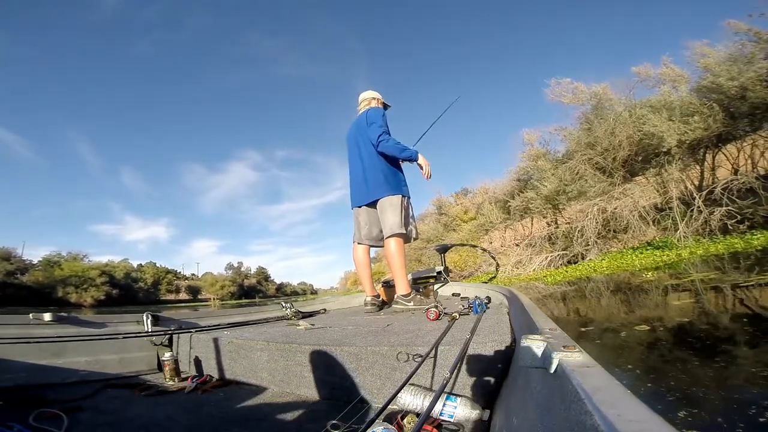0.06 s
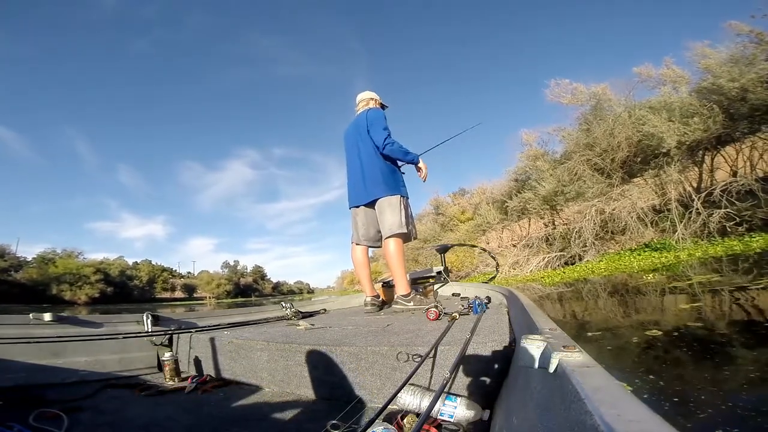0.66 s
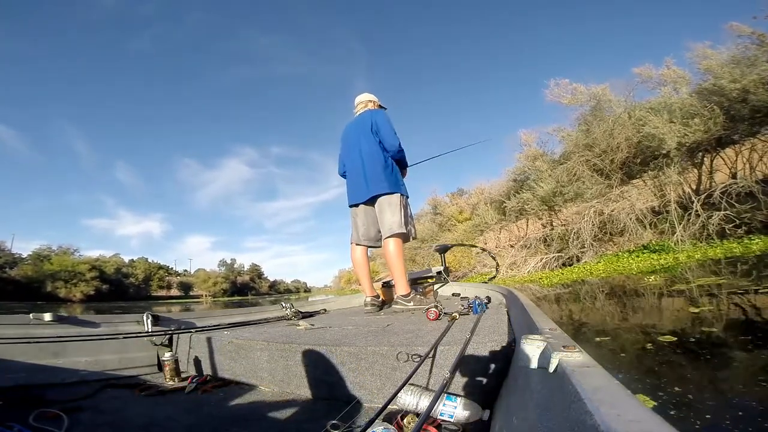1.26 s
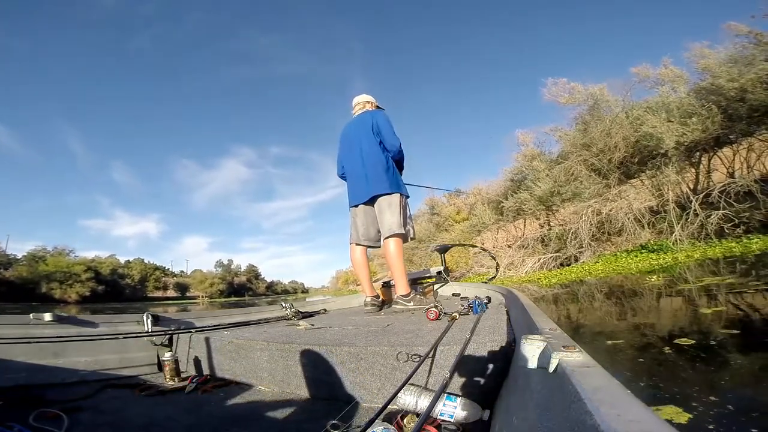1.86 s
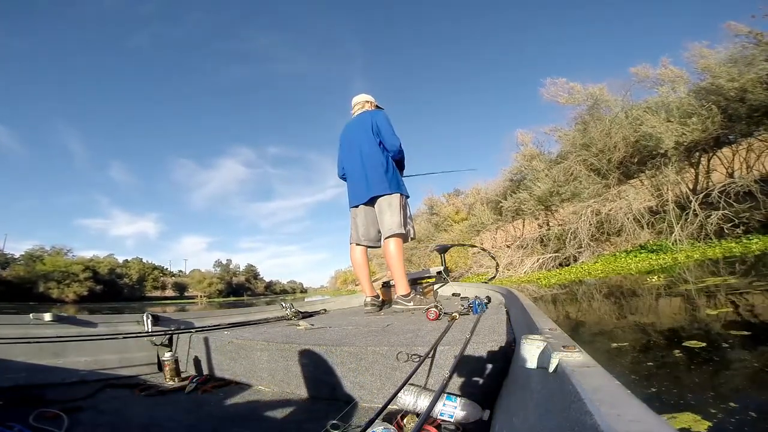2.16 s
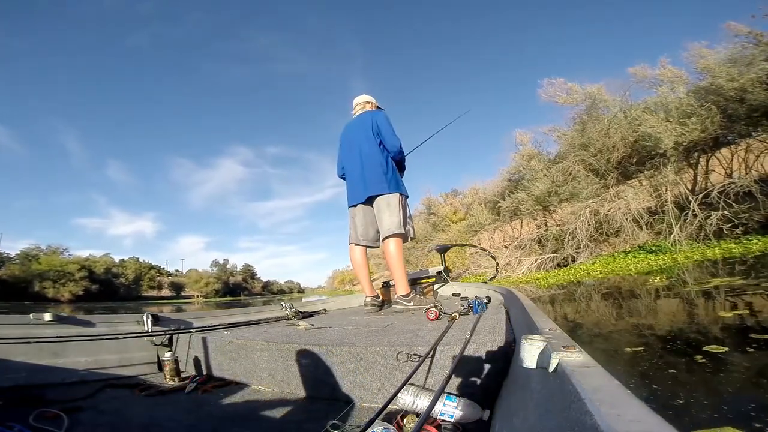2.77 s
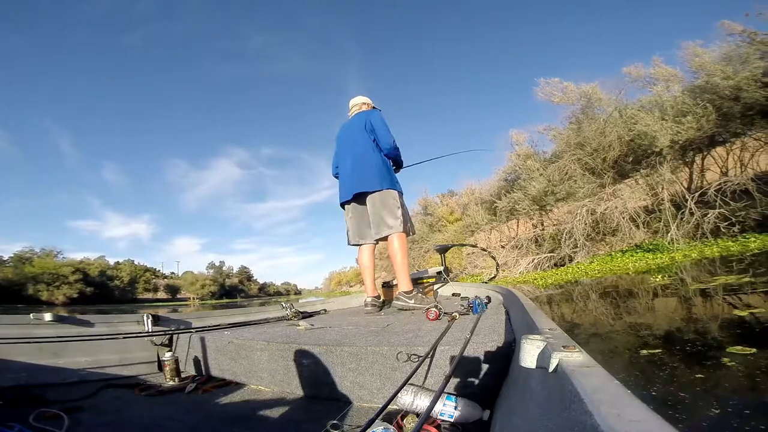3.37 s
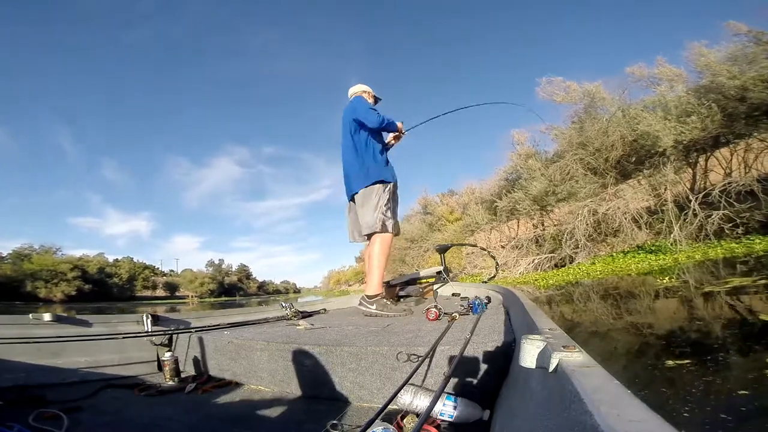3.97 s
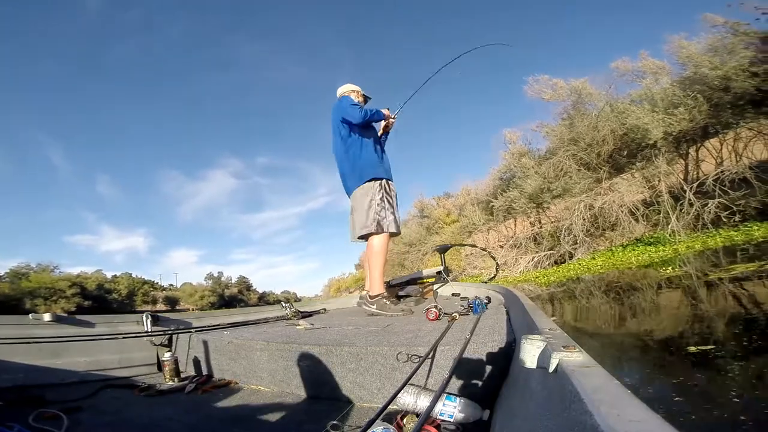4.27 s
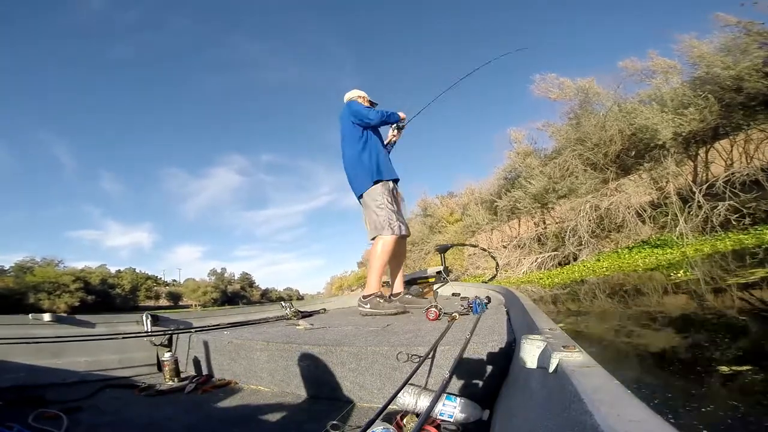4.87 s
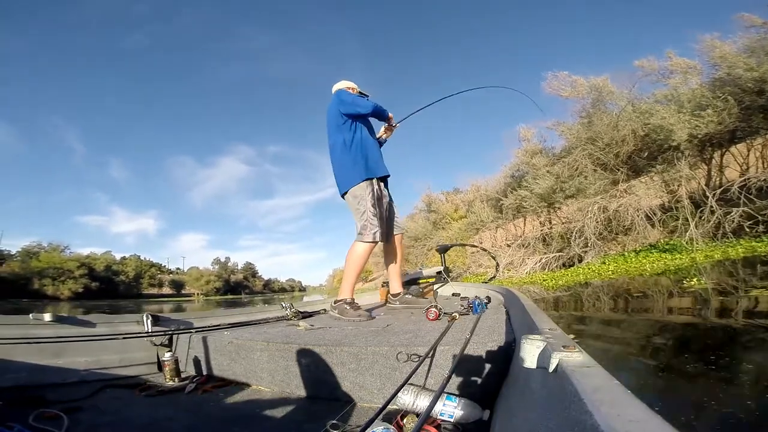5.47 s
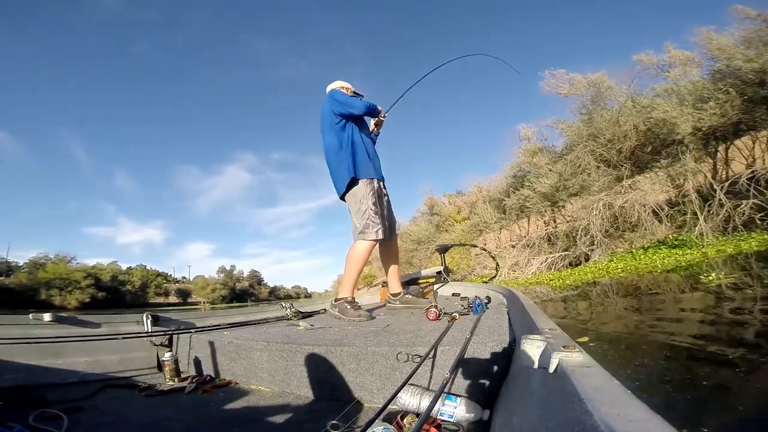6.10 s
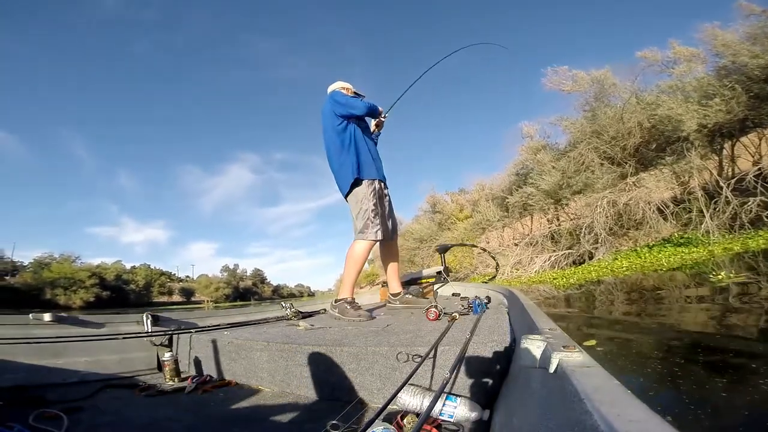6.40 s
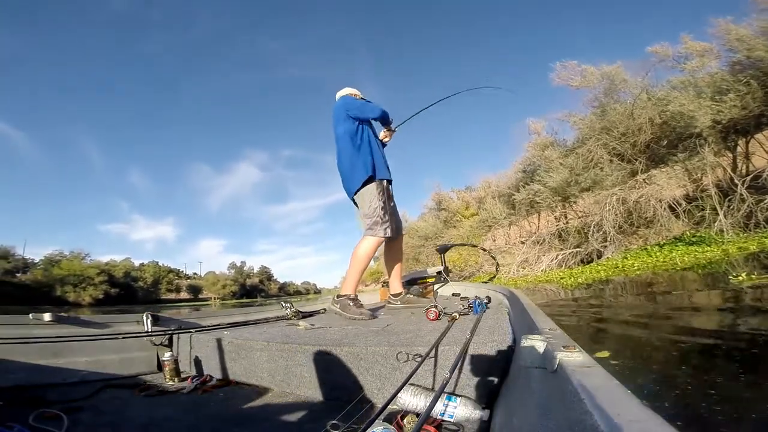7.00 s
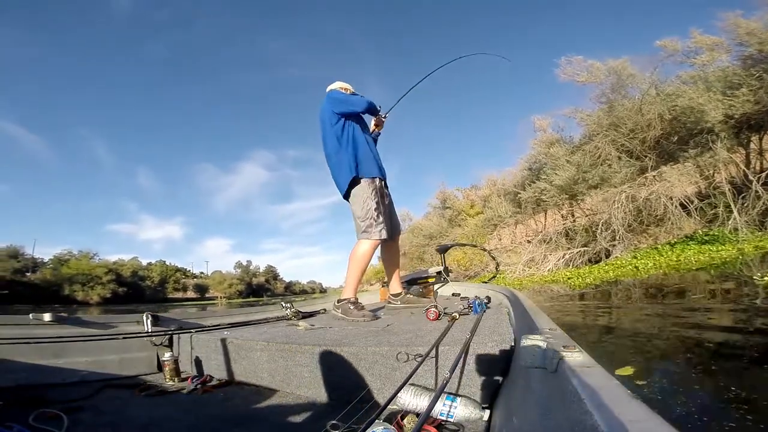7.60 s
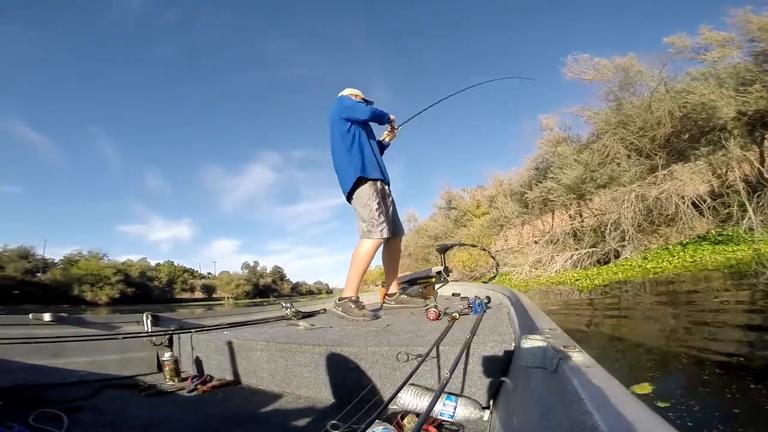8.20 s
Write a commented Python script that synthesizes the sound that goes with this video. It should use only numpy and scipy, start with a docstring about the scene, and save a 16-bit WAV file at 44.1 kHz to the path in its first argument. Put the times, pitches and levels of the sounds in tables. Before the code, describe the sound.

On a small boat on still water, sparse woody knocks and water slaps sound on the hull over a quiet outdoor hiss. About three seconds in, an angler's feet start thumping the hollow deck and the boat rumbles as it rocks. A reel whirrs faintly, tackle clicks, and the taut line squeaks briefly. Stamps and knocks continue to the end, heard from a microphone on the hull.

```python
"""An angler on the bow deck of a small boat on still water, heard from a microphone on the hull.
Over a quiet outdoor bed come woody knocks on the hull, many of them slaps of water, with clicks of tackle,
light steps and scuffs. Just after 3 s he hooks a fish: the reel whirrs faintly under load, loose gear
stirs, and his feet set the hollow deck booming and the boat rocking. Around 5 s the taut line squeaks
and a twisting sole groans; he stamps and plays the fish to the end."""
import sys
import numpy as np
from scipy import signal
from scipy.fft import rfft, irfft
from scipy.io import wavfile

SR = 44100
rng = np.random.default_rng(int(sys.argv[2]) if len(sys.argv) > 2 else 0)


def to_wav(sig):
    """Store sig (one row per channel, or 1-D mono) as 16-bit WAV at the path in sys.argv[1].

    Samples outside -1..1 are clipped; the rate is SR.
    """
    pcm = np.clip(np.atleast_2d(sig), -1, 1) * 32767
    pcm = np.round(pcm).astype(np.int16)
    wavfile.write(sys.argv[1], SR, pcm.T)  # frames by channels


N = 363825
TIME = np.arange(N) / SR

# outdoor bed of still air and hiss: f/Hz, level/dB
AIR_SPECTRUM = [(12, -37), (20, -16.5), (74, 2.5), (92, -1.5), (152, -8.5), (231, -7.5), (323, -11),
                (427, -14.5), (504, -15), (766, -18), (1040, -20.5), (1540, -23), (1720, -24.5),
                (2750, -27), (15500, -50)]
# the hull idling on the water: f/Hz, width/Hz, level/dB
IDLE_MODES = [(28, 19, -1.5), (70, 5.7, -7), (83.2, 4.6, 1.5)]
# ring of the panels and fittings: f/Hz, width/Hz, level/dB
PANEL_MODES = [(159.4, 21.2, 0), (213, 31.8, 5), (272.6, 32.3, 3), (359, 31, -2.5), (443, 49, -1.5),
               (561, 71, -4), (711, 93, -10), (880, 150, -12.5), (1055, 63, -8.5), (1303, 44, -16),
               (1418, 63, -17.5), (1847, 76, -9), (2315, 116, -13), (2614, 104, -20), (2918, 80, -15),
               (3190, 99, -20.5), (3484, 110, -24), (4030, 430, -35), (4656, 130, -29.5),
               (5230, 200, -41.5), (5860, 500, -38.5), (7400, 1100, -49.5), (9800, 2200, -59)]
# the bands a hit is layered from: low/Hz, high/Hz, delay/s, decay multiplier, level/dB
HIT_BANDS = [(151.3, 355, .001, 1.4, -1.5), (337, 670, -.001, 1.15, -2.5), (655, 1635, -.002, 1, -1.5),
             (1374, 2470, -.0016, .8, -2.5), (2576, 3970, 0, .85, -2), (4380, 11800, -.0004, .4, 0)]
# woody knocks on the hull, many of them slaps of water: t/s, level/dB, hardness (treble lift)/dB, decay/s
KNOCKS = [(0.773, -46.5, 2, .011), (0.791, -40, -10, 0.0089), (1.465, -56, 4.5, 0.014),
          (1.717, -45, 0, 0.02), (2.437, -43.5, -2, 0.018), (2.481, -54.5, 1, 0.017), (2.988, -43, 0, .012),
          (3.209, -52, -5, 0.022), (3.459, -43, -4, 0.041), (3.590, -38.5, -3.5, 0.013),
          (3.729, -37, -2.5, 0.0035), (3.775, -48, -0.5, 0.018), (3.86, -41.5, -2.5, 0.021),
          (3.916, -37.5, -4.5, 0.014), (3.949, -37.5, -13, 0.0037), (3.969, -24, -15.5, 0.012),
          (3.986, -32, -10.5, 0.0077), (4.063, -36, 1.5, 0.016), (4.28, -46, -3.5, .01),
          (4.338, -40.5, -7, 0.018), (4.485, -38, -2.5, 0.011), (4.563, -41, -8.5, 0.0055),
          (4.718, -37.5, -18, 0.0096), (4.774, -38.5, -19.5, 0.0079), (4.804, -23.5, -11, 0.0088),
          (4.823, -30, -20, 0.022), (4.848, -40, -1.5, 0.0066), (5.128, -50, -5, 0.033),
          (5.243, -37, 1, .008), (5.44, -46, -9.5, .02), (5.512, -49, 0.5, 0.0057), (5.844, -51, 0, .009),
          (6.032, -41, 0.5, 0.022), (6.055, -35.5, -15, 0.0092), (6.09, -45.5, 0.5, 0.0055),
          (6.205, -49, -4.5, 0.026), (6.385, -49.5, 5, 0.0096), (6.542, -45, 0, 0.011),
          (6.722, -45, -9, 0.012), (6.997, -42.5, -0.5, 0.012), (7.114, -48, -18, .009),
          (7.196, -41.5, -22, 0.015), (7.254, -44, -3.5, 0.021), (7.553, -42, -0.5, 0.011),
          (7.585, -35.5, -13.5, .012), (7.599, -35.5, -24, 0.015), (7.668, -41, -6.5, 0.0076),
          (7.801, -37.5, 2, 0.0047), (7.855, -44, -6.5, .011), (7.933, -41, -7.5, 0.012),
          (8.089, -46, -13, 0.036)]
# woody EQ of a knock: f/Hz, level/dB
KNOCK_EQ = [(240, 2.5), (460, 2.5), (1000, 0.5), (2000, -0.5), (3200, -6), (6800, -23.5)]
# sharp clicks of tackle: t/s, level/dB
CLICKS = [(0.777, -66), (0.791, -65), (1.72, -67), (2.502, -67), (2.977, -66), (2.988, -55.5),
          (3.115, -61.5), (3.459, -57), (3.918, -52.5), (4.062, -57), (4.081, -59), (4.117, -58),
          (4.338, -64), (4.775, -64.5), (4.847, -59), (5.243, -48.5), (6.032, -58), (6.346, -65),
          (6.996, -58), (7.553, -56), (7.668, -53.5)]
# bright EQ of a click, dull EQ of a sole's slap: f/Hz, level/dB
CLICK_EQ = [(290, -5), (1100, -0.5), (2000, 1.5), (3200, 7), (6800, 1.5)]
SOLE_EQ = [(290, -1), (700, -14.5), (2000, -31.5), (6800, -55.5)]
# footfalls and stamps: t/s, weight on the deck/dB, heave of the hull/dB, slap of the sole/dB
STEPS = [(0.793, -39, -58, -47), (1.711, -39.5, -62, -50), (2.49, -49, -50, -44.5),
         (3.549, -38, -27, -37.5), (3.594, -45, -24.5, -35), (3.747, -23, -19, -26),
         (3.794, -13, -35, -29.5), (3.954, -8.5, -22.5, -24), (4.334, -32.5, -36, -32),
         (4.567, -11, -41.5, -26), (4.783, -19.5, -40, -19), (4.813, -30, -11, -31.5),
         (5.2, -22.5, -20, -35), (5.24, -19, -29, -31.5), (5.42, -25, -51, -39), (6.092, -28.5, -62, -34),
         (6.22, -34.5, -66, -43.5), (6.71, -32, -52, -39.5), (6.8, -22.5, -58, -43), (7.021, -47, -47, -39),
         (7.196, -18, -22, -28.5), (7.24, -28.5, -20, -58), (7.629, -35, -46, -37),
         (7.803, -27, -53, -30.5), (7.869, -22.5, -63, -37.5), (7.946, -13.5, -36, -29.5),
         (8.03, -19, -25, -35.5), (8.08, -16.5, -48, -41)]
# boom of hull and deck under a step: f/Hz, level/dB, t60/s
BOOM_MODES = [(27.7, -1.5, 0.43), (52.5, 5, 0.31), (90.34, 0, 0.5), (122, -7, .12), (171.8, 7.5, 0.11),
              (215.2, 6.5, 0.39), (264, -10, 0.04), (358.5, -14.5, 0.3)]
# rumble of the rocking hull: f/Hz, width/Hz, level/dB
ROCKING_MODES = [(25.8, 9.0, -1.1), (53.3, 9.6, -2.1), (88.1, 6.3, -0.5)]
# soles and gear sliding, and the line zipping at 4.07 s: t/s, length/s, level/dB, tilt/(dB per octave)
SCRAPES = [(1.225, 0.063, -54, 0), (1.679, 0.05, -51, -1.5), (3.133, 0.051, -52, 1.5),
           (4.072, 0.075, -50, 5.5)]
# level ride of the reel under load: t/s, level/dB
REEL_LOAD = [(3.3, -69), (3.59, -66.5), (3.96, -55), (4.08, -59), (4.51, -62.5), (5.09, -57.5),
             (5.59, -67.5), (6.55, -63), (6.76, -58.5), (7.64, -65), (7.71, -62), (8.25, -60.5)]
# ring of the reel's frame: f/Hz, width/Hz, level/dB
REEL_MODES = [(1050, 200, -6), (1924, 78, 4.5), (2305, 58, -3), (2910, 220, -9), (3360, 190, -9),
              (3750, 380, -15.5), (5400, 1900, -20)]
# squeaks of taut line and reel: t/s, length/s, f/Hz, bend at the middle/Hz, level/dB
SQUEAKS = [(4.893, 0.069, 2930, 96, -58.5), (5.006, 0.042, 2890, 66, -54.5), (5.025, 0.072, 1855, 67, -60),
           (5.081, 0.07, 1860, 41, -63), (5.145, 0.079, 1850, -81, -56), (5.28, .052, 1820, 117, -58.5),
           (6.866, 0.04, 1840, 307, -57.5)]


def from_db(db):
    """Decibels as a gain."""
    return 10 ** (np.asarray(db) / 20)


def rms_one(x):
    """Normalise to an RMS of 1."""
    return x / np.sqrt(np.mean(x ** 2) + 1e-20)


def add(track, start_s, sound):
    """Lay a sound into a track."""
    at = max(round(start_s * SR), 0)
    track[at:at + len(sound)] += sound[:N - at]


def band(x, low_hz, high_hz):
    """Band-pass with steep edges."""
    return signal.sosfilt(signal.butter(3, [low_hz, high_hz], "band", fs=SR, output="sos"), x)


def resonate(x, modes):
    """Parallel resonators of alternating polarity."""
    out = 0
    for k, (hz, width, db) in enumerate(modes):
        r = np.exp(-np.pi * width / SR)
        poles = [1, -2 * r * np.cos(2 * np.pi * hz / SR), r * r]
        out = out + (-1) ** k * from_db(db) * (1 - r * r) / 2 * signal.lfilter([1, 0, -1], poles, x)
    return out


def grains(size, spread_db=5):
    """Grit: dense tiny contacts of very uneven strength."""
    return rng.standard_normal(size) * from_db(spread_db * np.clip(rng.standard_normal(size), -3, 3))


def drift(rate_hz):
    """Random modulator that glides from value to value."""
    return np.interp(TIME * rate_hz, np.arange(N), rng.standard_normal(N))


def arch(length_s):
    """Half a sine: a stroke that swells and ends."""
    return np.sin(np.linspace(0, np.pi, max(round(length_s * SR), 2))).clip(0)


def air(hiss_db=-50.5, murmur_db=-60):
    """A steady outdoor bed; the idle hull murmurs on the water."""
    hz, db = np.transpose(AIR_SPECTRUM)
    bins_hz = np.maximum(np.arange(N // 2 + 1) * SR / N, 1)
    eq = from_db(np.interp(np.log(bins_hz), np.log(hz), db))
    hiss = irfft(rfft(rng.standard_normal(N)) * eq, N)
    murmur = resonate(rng.standard_normal(N), IDLE_MODES)
    return from_db(hiss_db) * rms_one(hiss) + from_db(murmur_db) * rms_one(murmur)


def rattle(hits, eq, rise_s=0.0019, tail_db=-22, tail_s=0.064, graze_db=-13, graze_s=0.0028):
    """Each hit grazes, then rattles out into the panels; the lows come later and last longer."""
    lead = SR // 50  # room for the graze ahead of the hit
    attack = slice(lead, lead + SR // 40)
    t = TIME[:SR // 4] - TIME[lead]
    after = np.maximum(t, 0)
    graze = from_db(graze_db) * np.exp(-np.abs(t) / graze_s)
    rise = 1 - np.exp(-after / rise_s)
    panel_ring = resonate(signal.unit_impulse(len(t)), PANEL_MODES)
    eq_hz, eq_db = np.transpose(eq)
    out = np.zeros(N)
    for low, high, delay, stretch, gain_db in HIT_BANDS:
        ring = band(panel_ring, low, high)
        log_centre = np.log(low * high) / 2
        band_db = gain_db + np.interp(log_centre, np.log(eq_hz), eq_db)
        shelf = np.interp(log_centre, np.log([1100, 1960]), [0, 1])  # hard contacts lift the treble
        tail = from_db(tail_db) * np.exp(-after / (tail_s * stretch))  # loose gear trembles on
        for start, db, hardness_db, decay in hits:
            body = np.exp(-after / (decay * stretch))
            force = grains(len(t)) * (graze + rise * (body + tail))
            sound = signal.fftconvolve(force, ring)[:len(t)]
            gain = from_db(db + band_db + shelf * hardness_db)
            add(out, start + delay + t[0], gain * sound / np.std(sound[attack]))
    return out


def knocks(click_decay_s=0.0065):
    """Woody knocks on the hull, many of them slaps of water, and short bright clicks of tackle."""
    clicks = [(start, db, 0, click_decay_s) for start, db in CLICKS]
    return rattle(KNOCKS, KNOCK_EQ) + rattle(clicks, CLICK_EQ)


def steps(rise_s=0.0017, slap_decay_s=0.019, detune=0.011, hatch_db=-5):
    """A soft sole slaps the panels and sets the hull booming, tuned a little differently at each spot."""
    t, out = TIME[:SR], np.zeros(N)
    rise = 1 - np.exp(-t / rise_s)
    for start, weight_db, heave_db, slap_db in STEPS:
        for hz, db, t60 in BOOM_MODES:
            # heave drives the sub, weight the bass, the slap on the hatch the low mids
            push_db = np.interp(np.log(hz), np.log([27, 89, 218]),
                                [heave_db, weight_db, slap_db + hatch_db])
            swing = np.sin(2 * np.pi * hz * (1 + detune * rng.standard_normal()) * t)
            add(out, start, swing * rise * from_db(push_db + db - 60 * t / t60))
    slaps = [(start, slap_db, 0, slap_decay_s) for start, _, _, slap_db in STEPS]
    return out + rattle(slaps, SOLE_EQ)


def rocking(swell_s=0.022, fade_db_per_s=51, lean_db=-6, fight_start_s=3.286):
    """Each step leaves the hull rumbling and the deck murmuring; in the fight they never quite settle."""
    t, energy = TIME[:2 * SR], np.zeros(N)
    settling = (1 - np.exp(-t / swell_s)) * from_db(-fade_db_per_s * t)
    for start, weight_db, heave_db, _ in STEPS:
        push_energy = from_db(weight_db + lean_db) ** 2 + from_db(heave_db) ** 2
        add(energy, start, push_energy * settling ** 2)
    motion = np.sqrt(energy)
    fighting = TIME > fight_start_s
    hull = band(resonate(rng.standard_normal(N), ROCKING_MODES), 28.2, 150)
    grit = grains(N, spread_db=4.5) * from_db(5 * np.tanh(drift(rate_hz=49)))
    deck = band(resonate(grit, PANEL_MODES), 120, 1200)
    hull_gain = from_db(-7) * motion + from_db(-45) * fighting
    deck_gain = from_db(-30) * motion + from_db(-54) * fighting
    return hull_gain * rms_one(hull) + deck_gain * rms_one(deck)


def scrapes():
    """A short slide feeds grit into the panels; each scrape has its own brightness."""
    out, lowest_hz = np.zeros(N), PANEL_MODES[0][0]
    for start, length, db, tilt in SCRAPES:
        stroke = np.sqrt(arch(length))
        modes = [(hz, width, level + tilt * np.log2(hz / lowest_hz)) for hz, width, level in PANEL_MODES]
        scuff = stroke * resonate(grains(len(stroke)), modes)
        add(out, start, from_db(db) * rms_one(scuff))
    return out


def reel(trim_db=-1, roughness_db=4, cranking_db=2):
    """Gears and taut line rub unevenly and ring the reel's frame."""
    times, load_db = np.transpose(REEL_LOAD)
    load = from_db(np.interp(TIME, times, load_db)) * (TIME >= times[0])
    rubbing = grains(N) * from_db(roughness_db * np.tanh(drift(rate_hz=45)))
    effort = from_db(cranking_db * np.tanh(drift(rate_hz=9)))
    return from_db(trim_db) * load * rms_one(effort * resonate(rubbing, REEL_MODES))


def loose_gear(start_s=3.5, taps_per_s=5.9, tap_db=-55.5, spread_db=6, hardness_db=-12.5, decay_s=0.014):
    """While the fish is played, gear on the deck stirs in faint random taps."""
    span_s = TIME[-1] - start_s
    taps = [(start_s + when * span_s, tap_db + spread_db * (2 * force - 1), hardness_db, decay_s)
            for when, force in rng.random((round(taps_per_s * span_s), 2))]
    return rattle(taps, KNOCK_EQ)


def squeaks(rasp_db=-15, flutter_db=2, octave_db=-10):
    """Stick-slip sings near a resonance of the tackle; its pitch bends with the pull and trembles."""
    out = np.zeros(N)
    flutter = from_db(-flutter_db * drift(rate_hz=230))
    jitter_hz = 30 * drift(rate_hz=700) + 25 * drift(rate_hz=90)
    rasp = from_db(rasp_db) * rms_one(band(grains(N), 2900, 5100))
    for start, length, hz, bend_hz, db in SQUEAKS:
        pull = arch(length)
        span = slice(round(start * SR), round(start * SR) + len(pull))
        phase = 2 * np.pi * np.cumsum(hz + bend_hz * pull + jitter_hz[span]) / SR
        overtone = from_db(octave_db) * band(np.sin(2 * phase), 3100, 5500)
        tone = (np.sin(phase) + overtone + rasp[span]) * flutter[span]
        add(out, start, from_db(db) * rms_one(tone * np.sqrt(pull)))
    return out


def sole_groan(start_s=5.175, length_s=0.062, hz=353, bend_hz=8, level_db=-34.5, octave_db=-24):
    """A twisting rubber sole sticks and slips into a short hollow note."""
    out, pull = np.zeros(N), arch(length_s)
    phase = 2 * np.pi * np.cumsum(hz + bend_hz * pull) / SR
    tone = np.sin(phase) + from_db(octave_db) * np.sin(2 * phase)
    add(out, start_s, from_db(level_db) * rms_one(pull * tone))
    return out


def scene():
    """A mono mix: every layer reaches the one microphone on the hull."""
    boat = air() + knocks() + steps() + rocking() + scrapes()
    fight = reel() + loose_gear() + squeaks() + sole_groan()
    return (boat + fight)[None]


def record(dry):
    """Infrasound below about 12 Hz is rolled off; the top is cut steeply."""
    low_cut = signal.butter(2, 12, "high", fs=SR, output="sos")
    high_cut = signal.ellip(12, .1, 90, 15500, fs=SR, output="sos")
    return signal.sosfilt(high_cut, signal.sosfilt(low_cut, dry))


dry = scene()
out = record(dry)
to_wav(out)
```